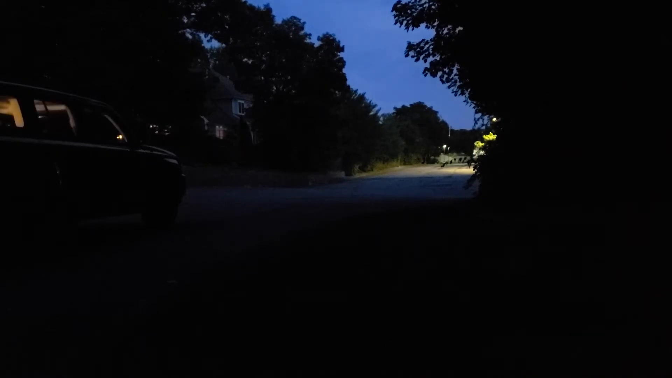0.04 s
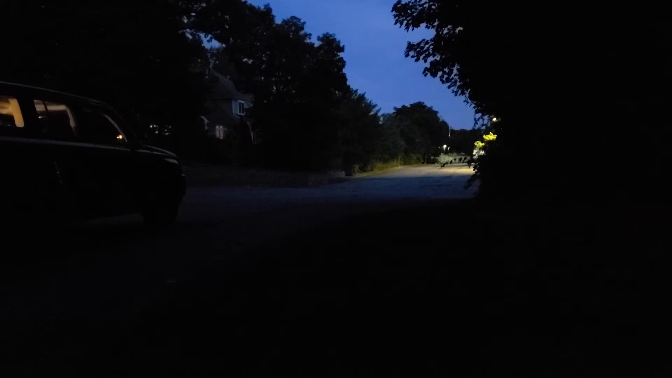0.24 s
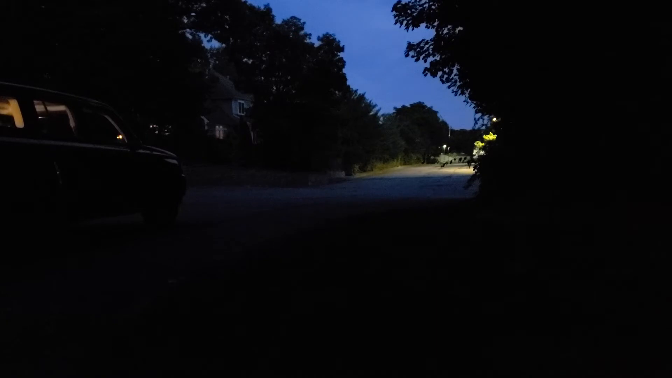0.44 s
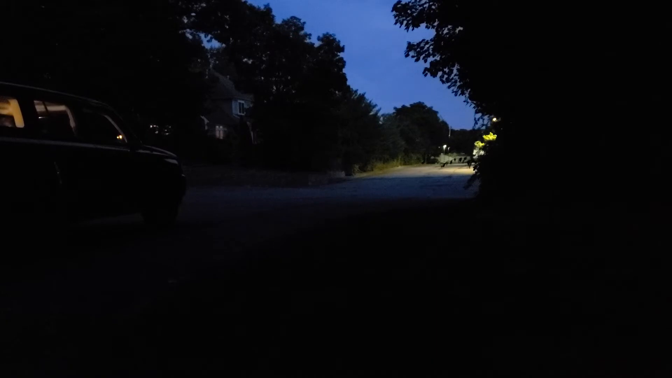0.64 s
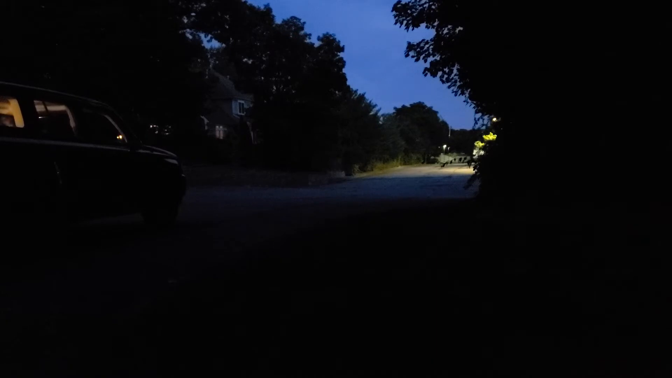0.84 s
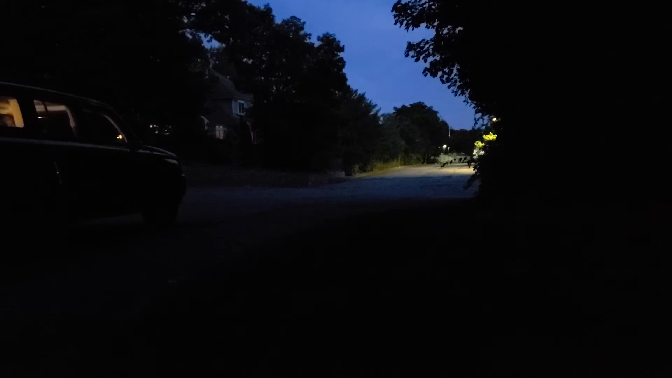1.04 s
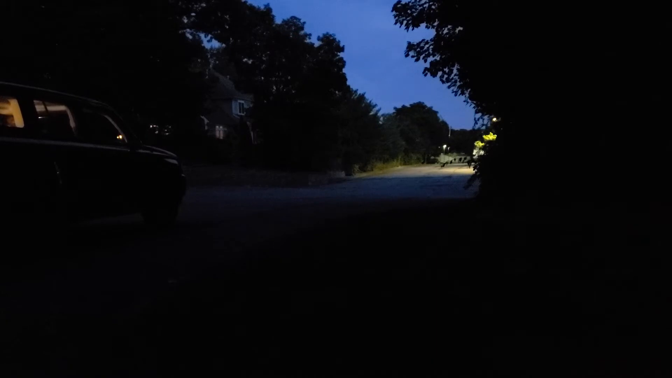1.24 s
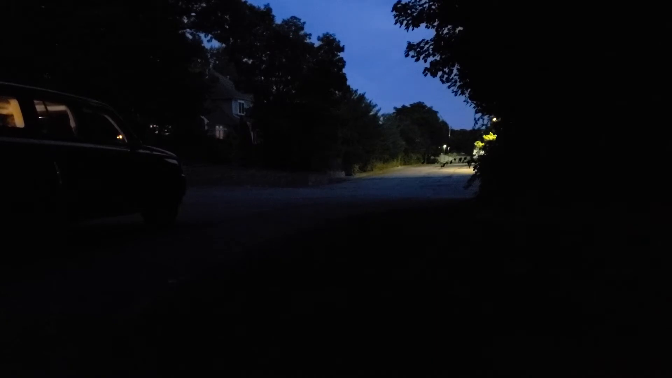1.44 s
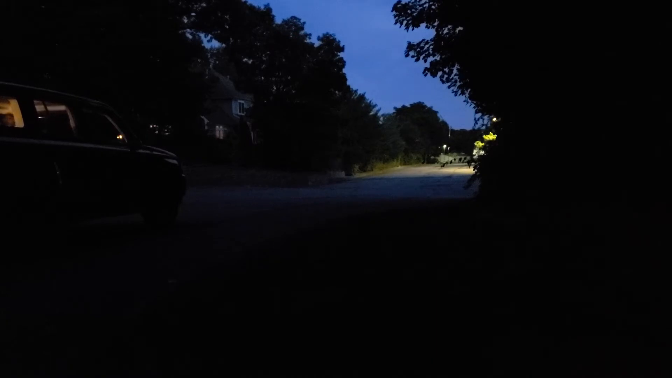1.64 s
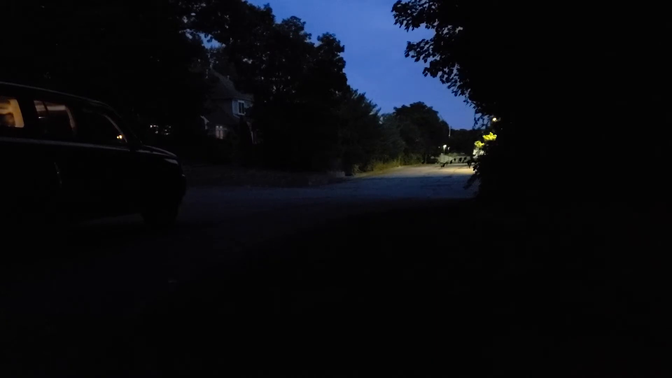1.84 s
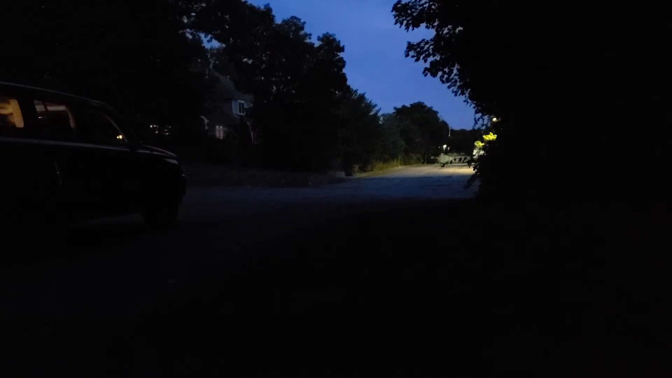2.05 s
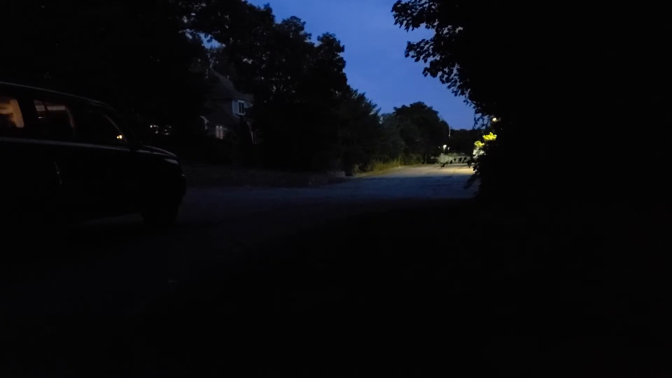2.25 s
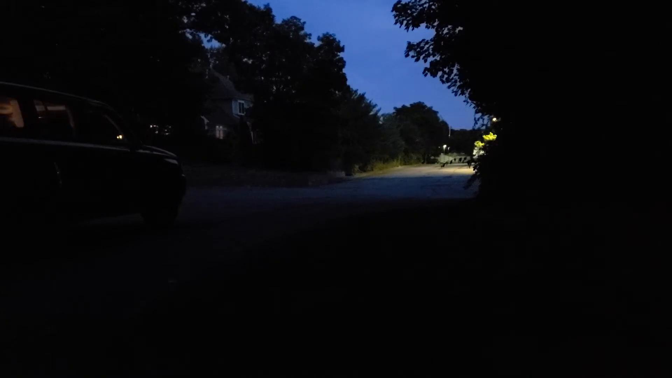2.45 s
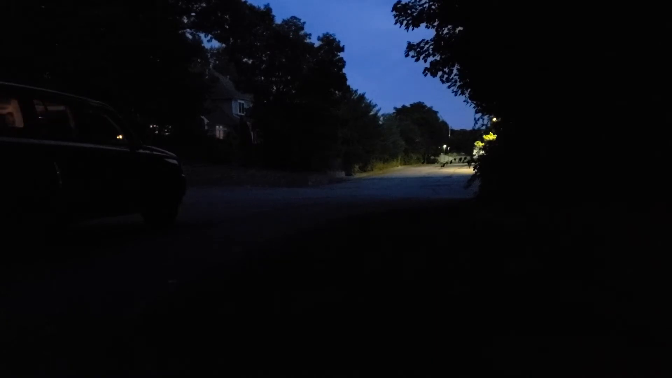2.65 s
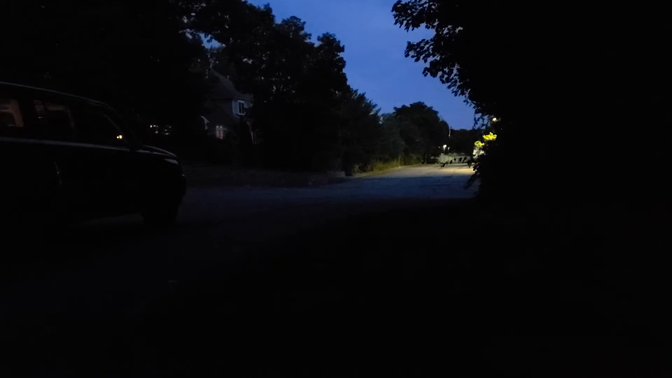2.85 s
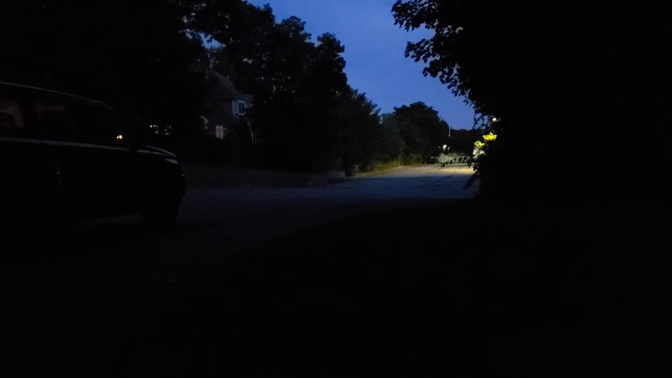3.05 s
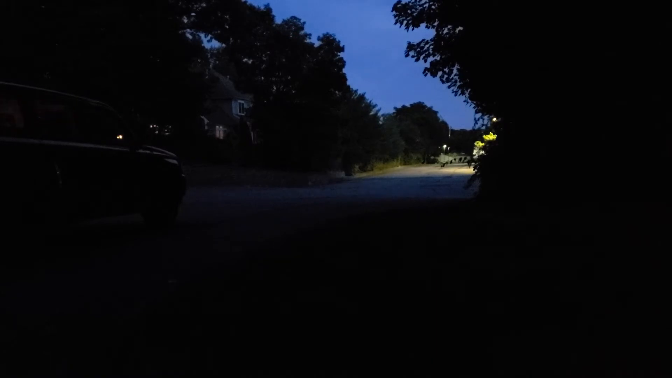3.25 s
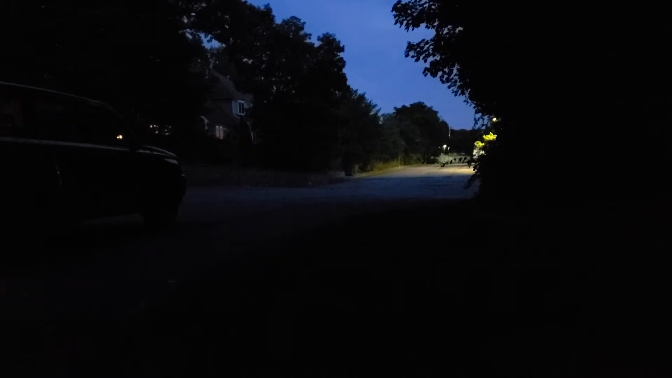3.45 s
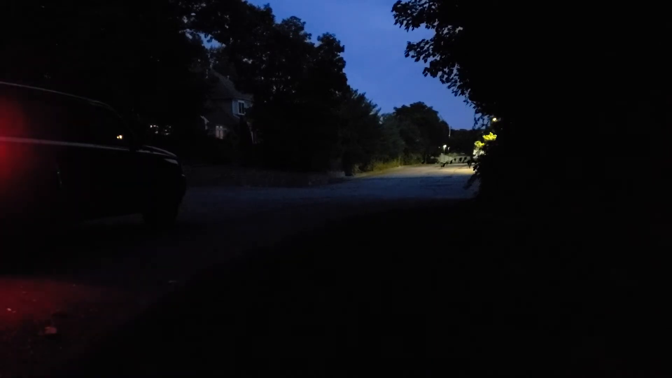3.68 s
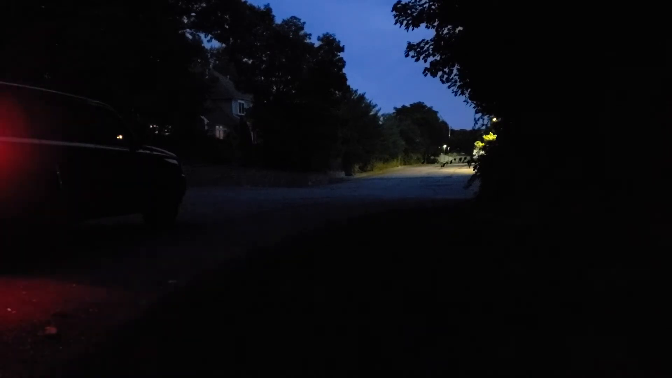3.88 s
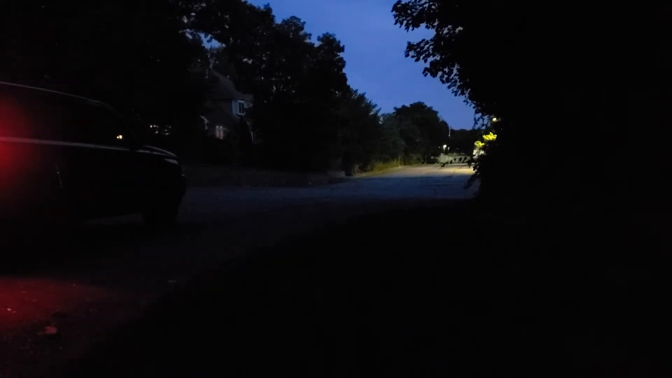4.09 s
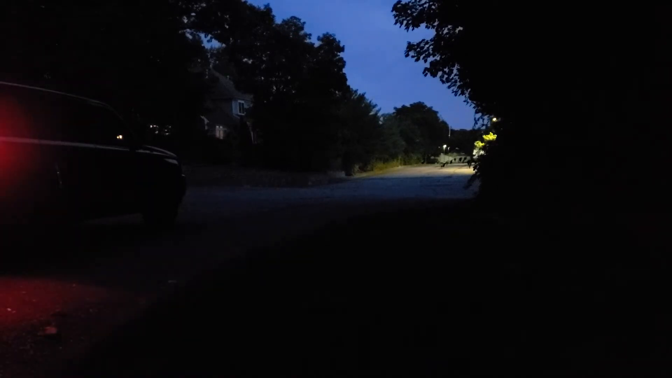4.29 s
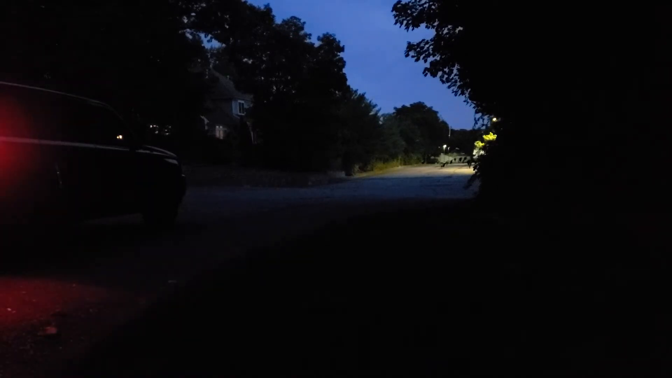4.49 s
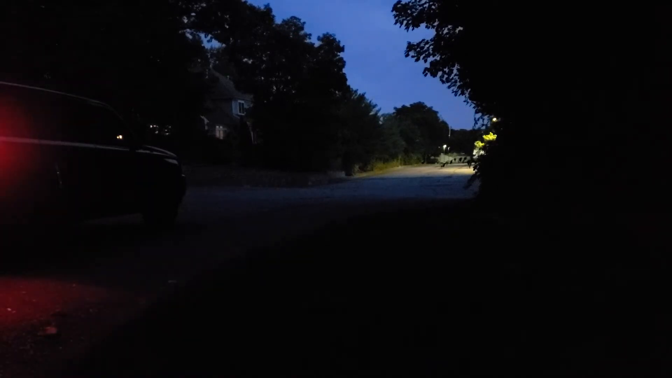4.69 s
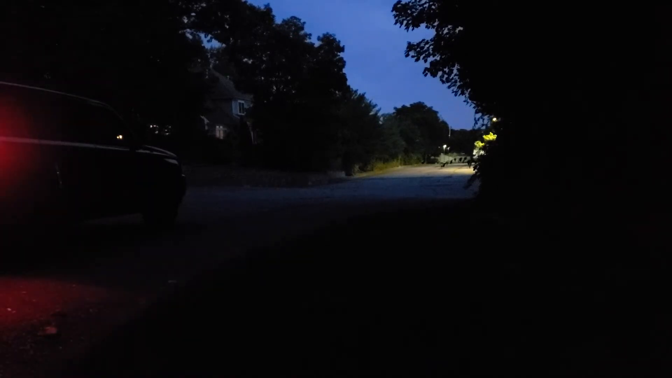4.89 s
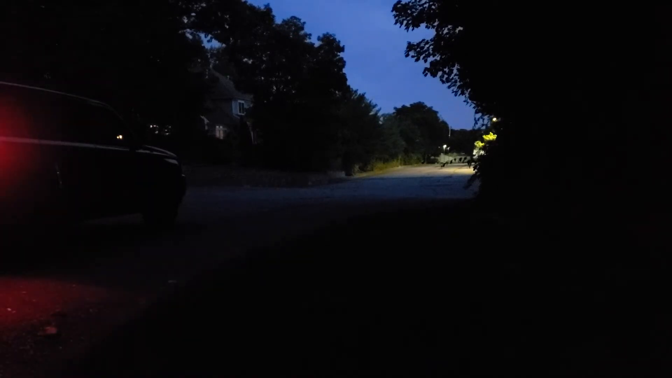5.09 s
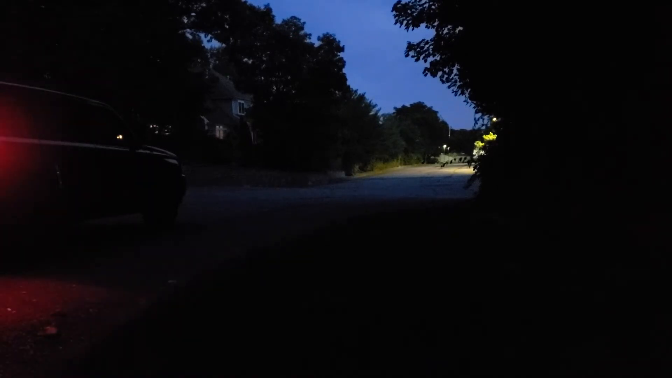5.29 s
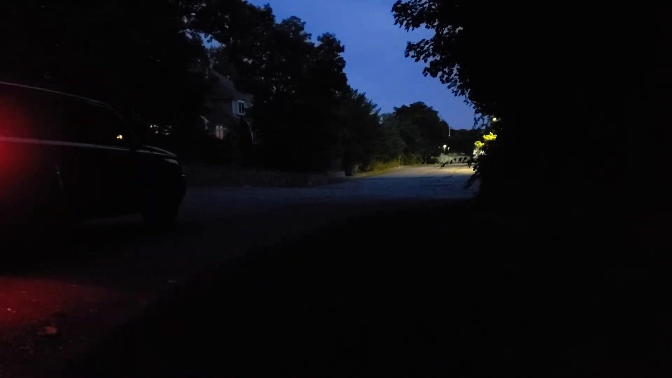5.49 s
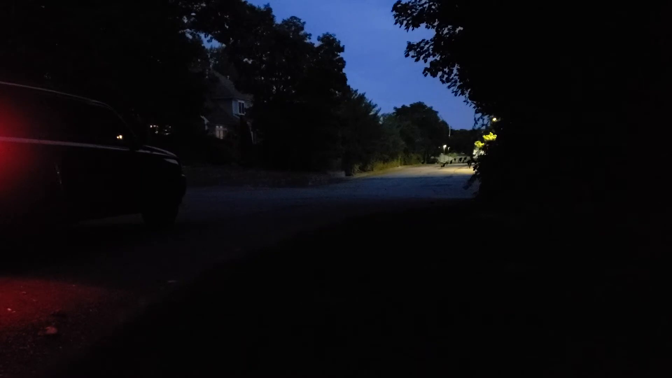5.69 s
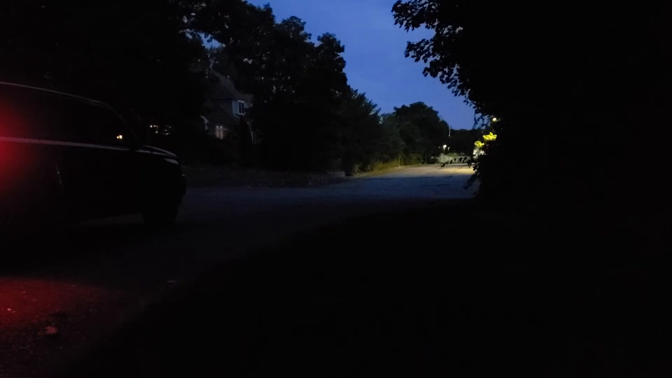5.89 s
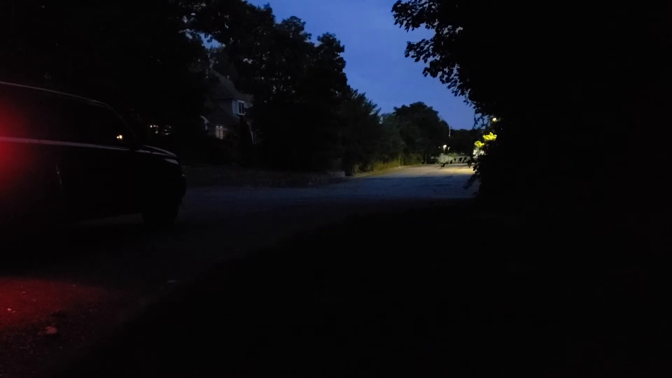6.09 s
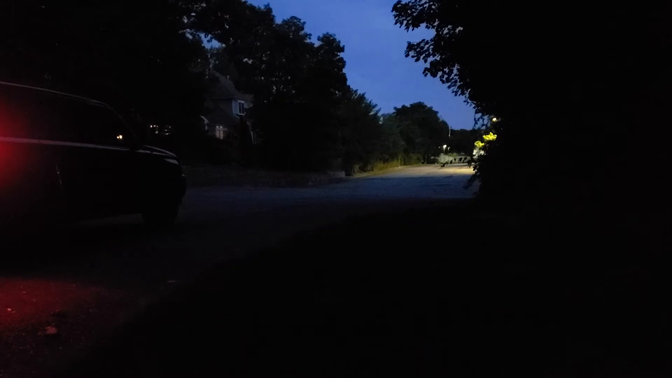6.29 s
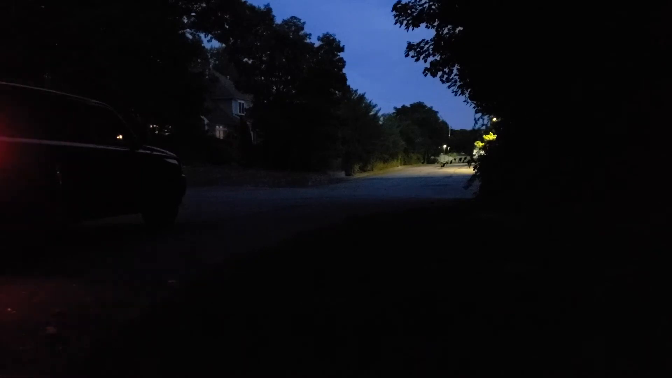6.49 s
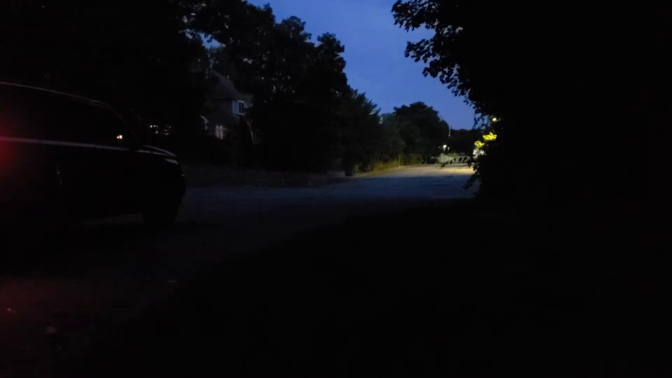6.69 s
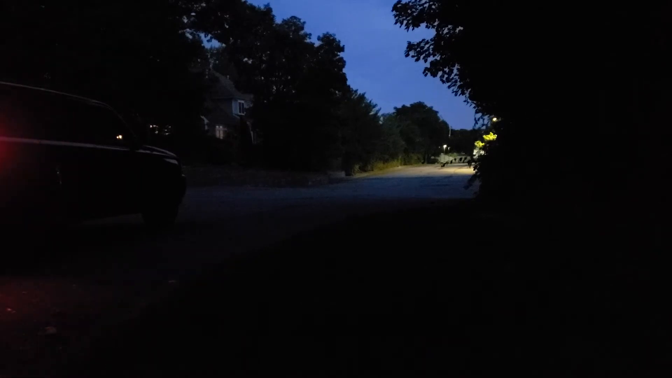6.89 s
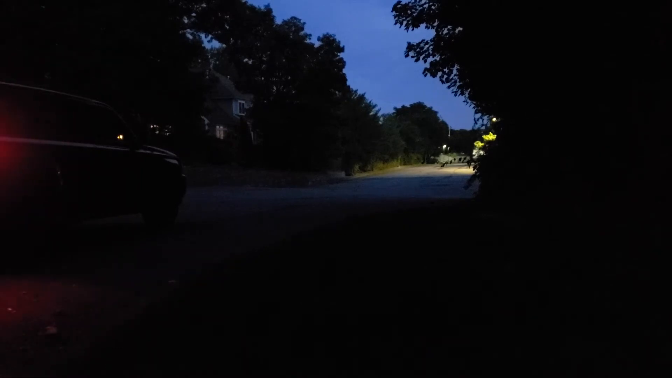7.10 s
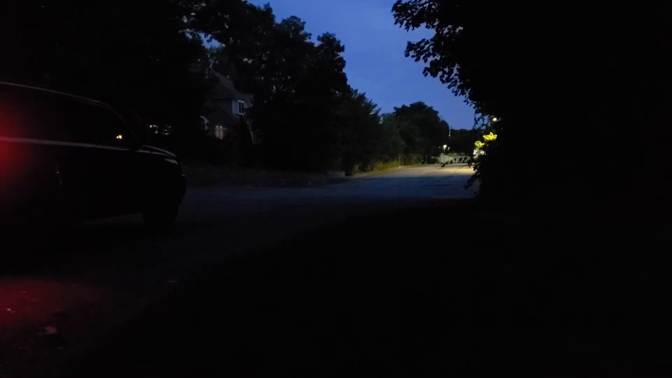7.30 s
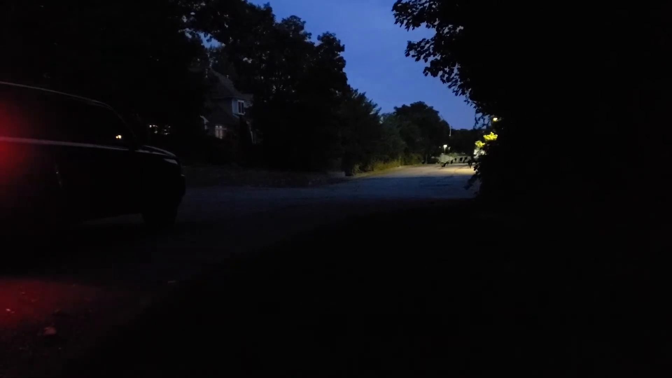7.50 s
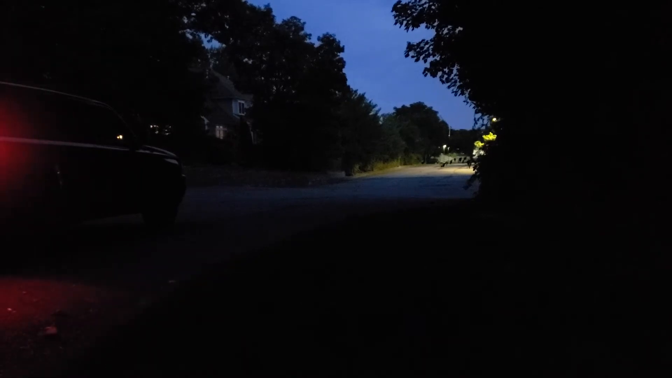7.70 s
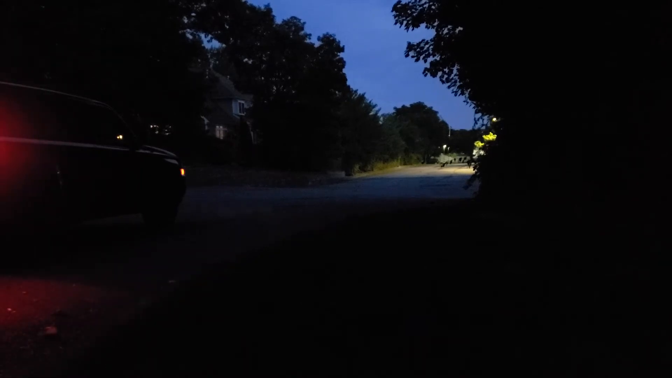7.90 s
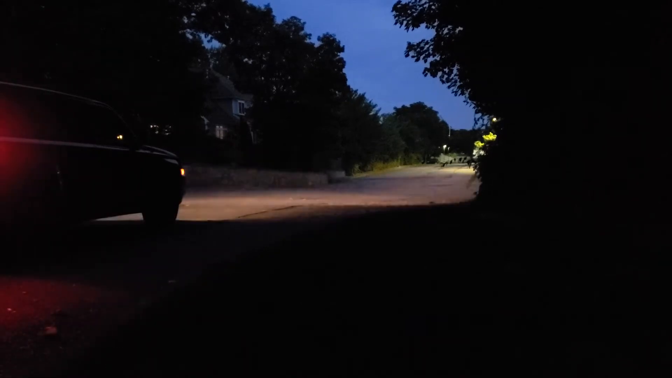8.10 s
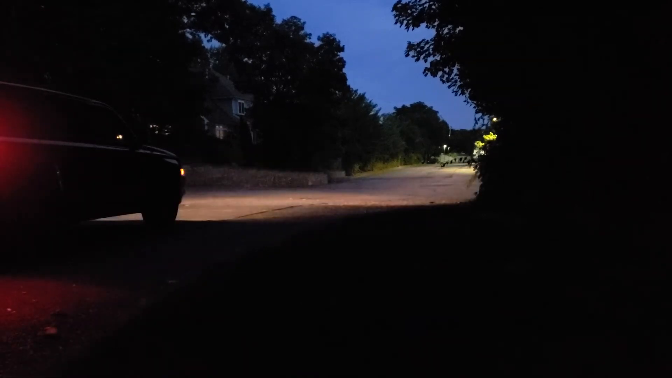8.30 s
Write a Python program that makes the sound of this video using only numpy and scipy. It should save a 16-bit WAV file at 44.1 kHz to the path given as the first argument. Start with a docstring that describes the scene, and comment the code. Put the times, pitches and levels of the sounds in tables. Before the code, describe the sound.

Soft evening crickets, a heavy car door slam with a rattle and airy sigh, then a gritty starter and a loud engine catching, revving and sinking.

```python
"""Crickets chirp over far traffic on a quiet street at dusk; one of them later trills.
A car to the left has its door shut: the latch, panels and trim ring and rattle, and air sighs past the seal.
Then its starter clacks in and grinds, made of coloured noise, jolts and a gliding whine.
The engine catches, races up and sinks to a deep idle: each firing sends a puff of gas into the tail pipe.
House fronts answer the car with a short echo, made of fading noise."""
import sys
import numpy as np
from scipy import signal
from scipy.fft import rfft, irfft, next_fast_len
from scipy.io import wavfile
from scipy.ndimage import uniform_filter1d, map_coordinates

SR = 44100
rng = np.random.default_rng(int(sys.argv[2]) if len(sys.argv) > 2 else 0)


def to_wav(s):
    """Save 16-bit WAV."""
    ch = np.atleast_2d(s).T  # columns
    pcm = np.round(np.clip(ch, -1, 1) * 32767)  # PCM
    wavfile.write(sys.argv[1], SR, pcm.astype(np.int16))


N = 367779  # length in samples

# Tone colour of far traffic: f/Hz, level/dB
TRAFFIC_COLOUR = [(12, -60), (20, -37), (41, -2.5), (68, 2), (161, -10.5), (187, -13), (228, -10.5),
                  (368, -21), (1090, -24.5), (1960, -39.5), (3370, -46.5), (3600, -51), (4680, -85.5),
                  (7920, -120)]
# A distant vehicle drones past: t/s, level/dB
PASSING_LEVEL = [(4.6, -81.5), (5.1, -61), (5.6, -66), (6.0, -72)]
# Tone colour of that drone: f/Hz, level/dB
DRONE_COLOUR = [(110, -30), (150, 5), (290, 3), (400, -35.5)]
# Tone colour of the blurred far crickets: f/Hz, level/dB
CHORUS_COLOUR = [(2060, -63), (3500, -39), (3820, -3), (4000, -3.5), (4220, 5), (4560, -1.5), (4900, 2),
                 (5080, 6), (5460, -2), (5660, -7.5), (6310, -24), (7500, -27), (8300, -32), (10800, -39),
                 (18300, -120)]
# Level of the far cricket chorus, lower from 7.2 s: t/s, level/dB
CHORUS_LEVEL = [(0, -57.5), (2.6, -60), (3.7, -57), (4.7, -58.5), (6.3, -56), (7.2, -64), (8.34, -62.5)]
# Tone colour of the microphone's hiss: f/Hz, level/dB
HISS_COLOUR = [(3820, -56), (6500, -0.5), (7440, -21), (9170, -7), (10600, -3.5), (15600, 3)]
# How alike left and right are in wide noise, below 0 counting as 0: f/Hz, likeness
LIKENESS = [(60, 0.94), (180, 0.98), (550, 0.42), (1650, -0.31), (4970, -0.9), (15000, -0.87)]
# Near crickets by name: f/Hz, wing strokes/(1/s), pulsing (0-1),
# climb at the start (share of pitch), left minus right level/dB
CRICKET_VOICES = {"low": (3968, 35.5, .65, .018, -3.5), "second": (4322, 39.5, .5, .004, -8),
                  "third": (4420, 39.5, .5, .006, -8), "faint": (4365, 39.5, .4, .012, -3),
                  "high": (5065, 39.5, .5, .003, -2)}
# Chirps of the near crickets: t/s, length/s, cricket name, level/dB
CHIRP_TIMES = [(0, 0.44, "low", -64.5), (0, 0.19, "second", -58.5), (0.399, 0.48, "third", -61.5),
               (0.447, .25, "high", -66), (0.728, 0.42, "low", -60), (0.999, 0.3, "high", -65),
               (1.123, 0.45, "faint", -65), (2.01, 0.52, "faint", -70), (2.212, 0.41, "second", -58.5),
               (2.3, 0.29, "third", -59), (2.325, 0.43, "low", -57), (2.719, 0.22, "high", -63.5),
               (3.033, 0.36, "faint", -65), (3.589, 0.37, "second", -58), (4.269, 0.38, "third", -60.5),
               (4.317, 0.41, "low", -58), (4.674, 0.31, "faint", -64), (5.148, 0.44, "second", -58.5),
               (5.2, 0.55, "low", -63), (6.051, 0.38, "third", -59.5), (6.251, 0.52, "low", -57),
               (7.549, 0.56, "low", -68)]
# Faint rasps and ticks in the hedges: t/s, length/s, f/Hz, width/Hz, level/dB
RASP_TIMES = [(0, 1, 7060, 900, -83), (0.12, 0.22, 2670, 700, -75.5), (0.416, 0.24, 10800, 900, -73.5),
              (0.45, 0.27, 7000, 500, -77), (2.377, 0.095, 7000, 1500, -75), (3.92, .02, 6800, 2000, -74),
              (4.752, 0.059, 2380, 1000, -71), (4.815, 0.091, 7900, 2500, -72), (6.05, .1, 7000, 1500, -78),
              (6.245, 0.055, 3250, 900, -74)]
# Blows on the car body (door latch, slam, rebounds; starter pinion; compression lurches):
# t/s, boom level/dB, rattle level/dB, crack level/dB
BODY_BLOWS = [(1.35, -42, -31, -79), (1.379, -26.5, -33.5, -66), (1.404, -26, -40, -62),
              (1.465, -31, -41.5, -72), (6.405, -50.5, -48, -36), (6.695, -43.5, -55, -66),
              (6.847, -46.5, -54, -61.5)]
# Ringing tones of the body panels: f/Hz, level/dB, time to fall 60 dB/s
PANEL_TONES = [(60.8, 11.5, 0.26), (77, 5, 0.25), (116.8, -1, 0.32), (200.8, -8.5, 0.28),
               (400, -19.5, 0.165), (655, -38, 0.1), (750, -30, 0.046), (978, -29, 0.11)]
# Tone colour of the rattling trim: f/Hz, level/dB
RATTLE_COLOUR = [(88, -29), (150, -2.5), (288, -4.5), (322, -7), (487, -11.5), (746, -12.5), (1560, -33),
                 (3000, -37), (3900, -86), (6600, -120)]
# Tone colour of the sharp crack of a blow: f/Hz, level/dB
CRACK_COLOUR = [(590, -35), (1000, -1), (1300, 4), (1800, -26.5), (3050, 0), (5540, -1.5), (10400, -16.5),
                (15600, -23)]
# Ringing tones of the door latch: f/Hz, level/dB, time to fall 60 dB/s
LATCH_TONES = [(755, 0, 0.11), (780, -3, .08), (1010, -7, .08), (1980, -7, 0.045), (2070, -1, .05)]
# Tone colour of air squeezed past the door seal: f/Hz, level/dB
SEAL_COLOUR = [(710, -29), (1200, 3), (1360, 1), (2310, 1), (3150, -3), (4790, -2.5), (5870, -10.5),
               (7350, -7.5), (8360, -22), (15600, -23)]
# Loudness of the trilling cricket: t/s, level/dB
TRILL_LEVEL = [(3.1, -84), (3.25, -59.5), (3.6, -54.5), (6.3, -54.5), (7.3, -61.5)]
# Overtones of its wing: multiple of the pitch, level/dB
WING_OVERTONES = [(1, 0), (2, -20), (3, -30)]
# Steady grinding of the starter: t/s, grind level/dB, sizzle level/dB
CRANK_LEVEL = [(6.4, -54.5, -66), (6.58, -57.5, -69), (6.68, -51, -60), (6.83, -54, -63), (7.0, -57, -57.5),
               (7.17, -53, -62)]
# Jolts in the starter gears: t/s, grind level/dB, sizzle level/dB
GEAR_JOLTS = [(6.404, -46, -59), (6.6, -46.5, -66), (6.785, -57, -54), (6.846, -40, -60), (6.911, -43, -45),
              (6.982, -42.5, -47.5)]
# Tone colour of the grind: f/Hz, level/dB
GRIND_COLOUR = [(180, -44), (300, -4), (342, 0), (685, 0), (836, -1.5), (1420, -3.5), (2010, -5.5),
                (2610, -3), (3240, -5.5), (4900, -6), (6930, -4), (8880, -16), (15600, -20.5)]
# Tone colour of the sizzle: f/Hz, level/dB
SIZZLE_COLOUR = [(5000, -22), (8500, -4), (10600, -12), (12000, 1.5), (14800, -13), (15600, -6)]
# Resonances of the starter housing: f/Hz, width/Hz, level/dB
HOUSING = [(1420, 150, -7), (2620, 150, -11), (3450, 90, -3), (5470, 150, -3), (5800, 100, -4),
           (7130, 120, -4), (7830, 100, -4)]
# Starter whine: t/s, f/Hz, level/dB
WHINE_GLIDE = [(6.585, 1100, -70), (6.61, 1249, -51), (6.635, 1402, -48.5), (6.68, 1480, -55),
               (6.73, 1248, -60), (6.79, 1100, -96)]
# Tone colour of the engine bay: f/Hz, level/dB
BAY_COLOUR = [(240, -14), (400, 2.5), (480, -5), (590, -5.5), (1940, -13), (4240, -15.5), (5500, -16.5),
              (8700, -27), (15600, -28)]
# Engine speed: t/s, firings/(1/s)
ENGINE_SPEED = [(6.94, 18.5), (6.97, 24), (7.006, 30.7), (7.04, 35.0), (7.08, 39.1), (7.154, 46.7),
                (7.196, 50.0), (7.302, 54.0), (7.4, 54.2), (7.52, 52.1), (7.668, 48.6), (7.796, 46.9),
                (8.15, 43.7), (8.34, 42.6)]
# Gas load of the firings: t/s, puff level/dB
GAS_LOAD = [(6.94, 3.5), (6.985, 8), (7.05, 7), (7.1, 3.5), (7.2, 3), (7.3, -2.5), (7.4, -5), (7.8, -6.5),
            (8.34, -11.5)]
# Tail pipe and silencer, with dead spots between their resonances: f/Hz, level/dB
PIPE_GAIN = [(28, -30), (52, -5.5), (80, 0), (100, -7.5), (128, -14.5), (165, -9.5), (194, -0.5),
             (220, -15.5), (250, -13.5), (300, -25.5), (352, -14), (380, -32.5), (420, -23), (560, -37),
             (800, -55.5)]
# Resonances of the silencer shell: f/Hz, width/Hz, level/dB
SILENCER_SHELL = [(513, 114, 4), (720, 180, -1.5), (1031, 41, 0), (1370, 300, -21)]
# The car is louder on the left: f/Hz, left minus right level/dB
CAR_SIDE_LEVEL = [(60, 1.5), (240, 2), (400, 6), (950, 11), (3770, 11.5), (7000, 17), (15000, 6)]
# Extra lead of the left side, largest in the middle range: f/Hz, lead/rad
EXTRA_LEAD = [(30, .05), (135, .2), (310, .55), (1250, .6), (2500, 0)]
# How long the street answers: f/Hz, time to fall 60 dB/s
STREET_DECAY = [(100, 0.5), (1000, 0.3), (5000, 0.9), (12000, 0.52)]

TRAFFIC_DB, HISS_DB = -51.5, -76
# further singers: count, pitch range in Hz, middle level, last start
CROWD, CROWD_HZ, CROWD_DB, CROWD_UNTIL_S = 36, (4100, 5200), -69.5, 6.6
LATCH_S, LATCH_DB = 1.353, -37
# door seal: start and peak level; time and rise to the peak; fall of 60 dB; left minus right
SEAL_S, SEAL_DB, SQUEEZE_S, SQUEEZE_DB, SEAL_T60_S, SEAL_PAN_DB = 1.358, -48, .11, 5.5, .69, 2.5
SEAL_TAIL_DB, SEAL_TAIL_T60_S = -20, 1.6  # a slower sigh, relative to the peak
STROKES_PER_S = 61.7  # average wing strokes of the trill
STARTER_ON_S, STARTER_OFF_S, PULL_OUT_S = 6.4, 7.14, .026
JOLT_RISE_S, JOLT_T60_S = .0016, .22
BAY_DB, BAY_AT_PER_S, BAY_GROWS = -58, 47.5, 1.74  # level at that firing rate; power of speed
PUFF_S, PUFF_AT_PER_S = .00058, 50  # half-width of a gas puff at that firing rate
SLOW_STRETCH = .35  # slower firings last longer by this power
JITTER_S = .00012  # scatter of firing times
BARK_DB, BARK_GROWS = -28, 1.9  # bark at a load of 0 dB; it swings wider than the load
TOP_HZ = 15750
HALVES = np.array([[.5], [-.5]])  # splits a left-right difference between the two sides


def amp(db):
    """dB to gain."""
    return 10 ** (np.asarray(db) / 20)


def decay(t, t60):
    """A gain that falls 60 dB in t60 seconds."""
    return amp(-60 * t / t60)


def unit(x):
    """Scaled to an rms (average strength) of 1."""
    return x / np.sqrt(np.mean(x ** 2) + 1e-20)


def along(points, hz):
    """Reads (f/Hz, value) points on a log frequency axis."""
    f, v = np.transpose(points)
    return np.interp(np.log(hz + 1), np.log(f + 1), v)


def curves(rows):
    """One value per sample for each column, and a gate that opens at the first row."""
    s, *columns = np.transpose(rows)
    t = np.arange(N) / SR
    return [np.interp(t, s, c) for c in columns] + [t >= s[0]]


def wobble(rate):
    """A smooth random curve with rate knots a second."""
    knots = rng.standard_normal(int(N * rate / SR) + 4)
    return map_coordinates(knots, [np.arange(N) * rate / SR])


def filtered(x, response):
    """x times a response of frequency; a mirrored, fading run-out keeps the end smooth."""
    ends = [(0, 0)] * (x.ndim - 1) + [(0, 2048)]
    longer = np.pad(x, ends, "reflect", reflect_type="odd")
    longer[..., -2048:] *= np.hanning(4096)[2048:]
    m = 2 * next_fast_len(x.shape[-1] // 2 + SR // 4)
    spectrum = rfft(longer, m) * response(np.fft.rfftfreq(m, 1 / SR))
    return irfft(spectrum, m)[..., :x.shape[-1]]


def resonant(modes):
    """Response of (f/Hz, width/Hz, level/dB) resonances with alternating signs; rings only forward in time."""
    def response(f):
        total = 0
        for k, (centre, width, db) in enumerate(modes):
            peak = 1j * f * width / (centre * centre - f * f + 1j * f * width)
            total = total + (-1) ** k * amp(db) * peak
        return total
    return response


def causal(spectrum):
    """Minimum-phase response with the gain of (f/Hz, level/dB) points: it sounds as early as it can."""
    def response(hz):
        cepstrum = irfft(np.log(amp(along(spectrum, hz))))
        half = len(cepstrum) // 2
        # fold the second half of time onto the first
        cepstrum[1:half] *= 2
        cepstrum[half + 1:] = 0
        return np.exp(rfft(cepstrum))[:len(hz)]
    return response


def noise(spectrum, size=N):
    """Coloured noise of rms 1."""
    return unit(filtered(rng.standard_normal(size), lambda hz: amp(along(spectrum, hz))))


def wide(spectrum):
    """Stereo noise of rms 1, alike in the bass and unrelated in the treble."""
    def response(hz):
        turn = np.arccos(np.clip(along(LIKENESS, hz), 0, 1)) / 2
        return amp(along(spectrum, hz)) * [np.cos(turn), np.sin(turn)]
    mid, side = filtered(rng.standard_normal((2, N)), response)
    return unit(np.array([mid + side, mid - side]))


def dusk():
    """Far traffic, a passing drone, the blur of far crickets and the microphone's hiss, all coloured noise."""
    traffic = amp(TRAFFIC_DB + .96 * wobble(3.27)) * wide(TRAFFIC_COLOUR)
    passing = amp(curves(PASSING_LEVEL)[0]) * wide(DRONE_COLOUR)
    chorus_db = curves(CHORUS_LEVEL)[0] + 1.1 * wobble(6) + .84 * wobble(40)
    chorus = amp(chorus_db) * wide(CHORUS_COLOUR)
    return traffic + passing + chorus + amp(HISS_DB) * wide(HISS_COLOUR)


def chirps():
    """Wing strokes pulse each tone, whose pitch climbs at the start; further singers join at random."""
    out = np.zeros((2, N + SR))
    calls = [(s, length, db) + CRICKET_VOICES[name] for s, length, name, db in CHIRP_TIMES]
    for when, long, loud, high, side in rng.random((CROWD, 5)):
        hz = CROWD_HZ[0] + high * (CROWD_HZ[1] - CROWD_HZ[0])
        db, pan_db = CROWD_DB + 6 * (loud - .5), 12 * (side - .5)
        calls.append((when * CROWD_UNTIL_S, .2 + .3 * long, db, hz, 39.5, .4, .008, pan_db))
    for s, length, db, hz, rate, pulsing, climb, pan_db in calls:
        t = np.arange(round(length * SR)) / SR
        stroke_phase = 2 * np.pi * rate * t
        pitch = hz * (1 - climb * np.exp(-t / .035) + .009 * pulsing ** 2 * np.sin(stroke_phase))
        # the wing wavers
        pitch += 20 * unit(uniform_filter1d(rng.standard_normal(len(t)), size=1200))
        strokes = 1 - pulsing * np.cos(stroke_phase)
        swell = np.clip(t / .021, 0, 1) * np.clip((length - t) / .05, 0, 1)
        uneven = amp(2.5 * unit(uniform_filter1d(rng.standard_normal(len(t)), size=800)))
        tone = swell * strokes * uneven * np.sin(2 * np.pi * np.cumsum(pitch) / SR)
        out[:, round(s * SR):][:, :len(t)] += amp(db + pan_db * HALVES) * tone
    return out[:, :N]


def rasps():
    """Short noises, each limited to a band around one pitch."""
    out = np.zeros((2, N))
    for s, length, hz, width, db in RASP_TIMES:
        n = round(length * SR)
        band = filtered(rng.standard_normal((2, n)), lambda f: np.exp(-2 * ((f - hz) / width) ** 2))
        out[:, round(s * SR):][:, :n] += amp(db) * unit(band) * np.hanning(n) ** .5
    return out


def body():
    """Each blow booms in the panels, rattles the trim and cracks; the latch rings."""
    out, t = np.zeros(N + SR), np.arange(SR // 2) / SR
    for s, boom_db, rattle_db, crack_db in BODY_BLOWS:
        boom = np.zeros(len(t))
        for hz, db, t60 in PANEL_TONES:
            # every blow excites the panels a little differently
            boom -= amp(db + rng.normal(0, 1.6)) * decay(t, t60) * np.sin(2 * np.pi * hz * t)
        boom *= amp(boom_db) * (1 - np.exp(-t / .0039))  # rubber makes the contact soft
        rattle = amp(rattle_db) * decay(t, .33) * noise(RATTLE_COLOUR, len(t))
        crack = amp(crack_db) * decay(t, .12) * noise(CRACK_COLOUR, len(t))
        out[round(s * SR):][:len(t)] += boom + (rattle + crack) * (1 - np.exp(-t / .0031))
    ring = sum(amp(LATCH_DB + db) * decay(t, t60) * np.sin(2 * np.pi * hz * t)
               for hz, db, t60 in LATCH_TONES)
    out[round(LATCH_S * SR):][:len(t)] += ring * (1 - np.exp(-t / .004))
    return out[:N]


def seal():
    """Air squeezed past the door seal swells, dies and sighs, spread wide by the street."""
    late = np.arange(N) / SR - SEAL_S - SQUEEZE_S  # s after the peak
    seal_db = SEAL_DB + np.where(late < 0, SQUEEZE_DB * late / SQUEEZE_S, -60 * late / SEAL_T60_S)
    sigh = (late > 0) * amp(SEAL_DB + SEAL_TAIL_DB) * decay(np.abs(late), SEAL_TAIL_T60_S)
    strength = (late > -SQUEEZE_S) * np.hypot(amp(seal_db), sigh)
    return amp(SEAL_PAN_DB * HALVES) * strength * wide(SEAL_COLOUR)


def trill():
    """Every fast wing stroke slides down in pitch, with weak overtones."""
    db, singing = curves(TRILL_LEVEL)
    stroke = np.cumsum(STROKES_PER_S * (1 + .012 * wobble(4))) / SR % 1  # 0-1 through each stroke
    pitch = 4960 - 520 * stroke ** 2.2 + 25 * wobble(70)
    phase = 2 * np.pi * np.cumsum(pitch) / SR
    shape = np.sin(np.pi * np.clip(stroke / .9, 0, 1)) ** .6 * amp(1.5 * wobble(30))
    tone = sum(amp(level) * np.sin(k * phase) for k, level in WING_OVERTONES)
    return singing * amp(db) * shape * tone


def machinery(turns):
    """Starter gears grind and jolt in their housing; once they part, valves clatter once a firing."""
    t = np.arange(N) / SR
    grind_db, sizzle_db, _ = curves(CRANK_LEVEL)
    grinding, sizzling = amp(grind_db), amp(sizzle_db)
    for s, jolt_db, hiss_db in GEAR_JOLTS:
        late = np.clip(t - s, 0, None)
        jolt = (1 - np.exp(-late / JOLT_RISE_S)) * decay(late, JOLT_T60_S)
        grinding = np.hypot(grinding, amp(jolt_db) * jolt)
        sizzling = np.hypot(sizzling, amp(hiss_db) * jolt)
    housing = .5 * unit(filtered(rng.standard_normal(N), resonant(HOUSING)))
    gears = grinding * amp(wobble(43)) * (noise(GRIND_COLOUR) + housing)
    gears += sizzling * noise(SIZZLE_COLOUR)

    clatter = 1 + .18 * np.cos(2 * np.pi * turns)
    speed_gain = (curves(ENGINE_SPEED)[0] / BAY_AT_PER_S) ** BAY_GROWS
    bay = amp(BAY_DB + wobble(19)) * speed_gain * clatter * noise(BAY_COLOUR)

    hz, whine_db, whining = curves(WHINE_GLIDE)
    grainy = unit(uniform_filter1d(rng.standard_normal(N), size=150))  # tooth errors smear the whine
    whine = whining * amp(whine_db) * grainy * np.sin(2 * np.pi * np.cumsum(hz) / SR)

    parted = np.clip((t - STARTER_OFF_S) / PULL_OUT_S, 0, 1)
    return (t >= STARTER_ON_S) * (1 - parted) * gears + parted * bay + whine


def exhaust():
    """One gas puff per firing rings the pipe; under load a burst of turbulence also barks in the silencer."""
    rate, running = curves(ENGINE_SPEED)
    puff_db, _ = curves(GAS_LOAD)
    turns = np.cumsum(rate * running) / SR  # firings so far
    nearest = np.round(turns).astype(int)
    firings = nearest[-1] + 1
    before_start = np.arange(N) / SR - ENGINE_SPEED[0][0]
    since = np.where(turns > 0, (turns - nearest) / rate, before_start)  # s from the nearest firing

    scatter_db = rng.standard_normal(firings)[nearest]  # no two firings alike
    since = since + JITTER_S * rng.standard_normal(firings)[nearest]
    widths = since / PUFF_S * (rate / PUFF_AT_PER_S) ** SLOW_STRETCH
    puffs = -amp(puff_db + scatter_db) * np.exp(-.5 * widths ** 2)

    after = turns % 1 / rate  # s since the last firing
    burst = running * (1 - np.exp(-after / .0012)) * decay(after, .045)
    bark_scatter_db = 2 * rng.standard_normal(firings)[turns.astype(int)]
    bark_db = BARK_DB + BARK_GROWS * puff_db + bark_scatter_db
    bark = amp(bark_db) * burst * rng.standard_normal(N)
    shell = lambda hz: resonant(SILENCER_SHELL)(hz) / (1 + (hz / 1900) ** 4)  # duller in the treble
    return filtered(puffs, causal(PIPE_GAIN)) + filtered(bark, shell), turns


def from_left(x, lead_s):
    """The left microphone hears the car earlier and louder."""
    lead = lambda hz: 2 * np.pi * hz * lead_s + along(EXTRA_LEAD, hz)
    louder = lambda hz: amp(HALVES * along(CAR_SIDE_LEVEL, hz))
    return filtered(x, lambda hz: louder(hz) * np.exp(1j * HALVES * lead(hz)))


def echo(x, gap_s):
    """The street answers after a gap with a noise tail; each frequency dies at its own speed."""
    hz, t, grains = signal.stft(rng.standard_normal((2, SR // 2)), SR, nperseg=256)
    fading = grains * decay(t, along(STREET_DECAY, hz)[:, None])
    tail = signal.istft(fading, SR, nperseg=256)[1]
    late = np.pad(np.atleast_2d(x), ((0, 0), (round(gap_s * SR), 0)))
    return signal.fftconvolve(late, tail / np.linalg.norm(tail[0]), axes=1)[:, :N]


def scene():
    """Car and insects in the street."""
    pipe, turns = exhaust()
    metal, blows = machinery(turns), body()
    car = from_left(pipe + metal + blows, lead_s=9 / SR)
    car += echo(amp(-20) * pipe + amp(2.5) * metal + amp(-10) * blows, gap_s=.02)
    insects = chirps() + trill() * amp(-HALVES)  # the trill sits slightly right
    insects += amp(-6) * echo(insects, gap_s=.01)
    return car + seal() + insects + rasps() + dusk()


def record(dry):
    """The small microphones lose the deepest bass; nothing is kept above the band limit."""
    thin = lambda hz: (1j * hz / (1j * hz + 30)) ** 2
    return filtered(dry, lambda hz: thin(hz) * (hz < TOP_HZ))


dry = scene()
out = record(dry)
to_wav(out)
```